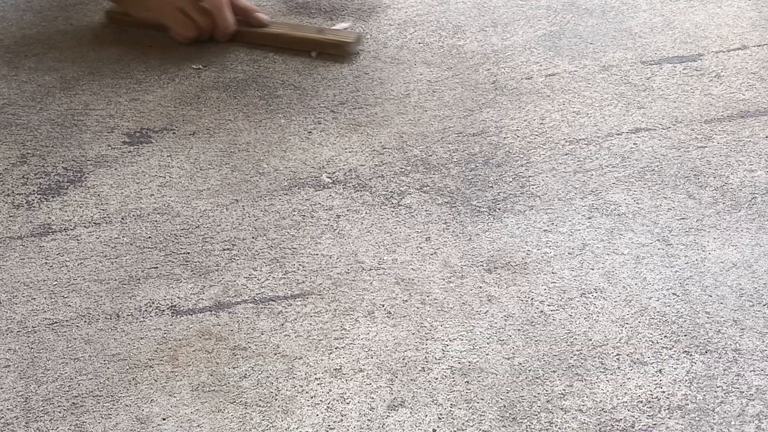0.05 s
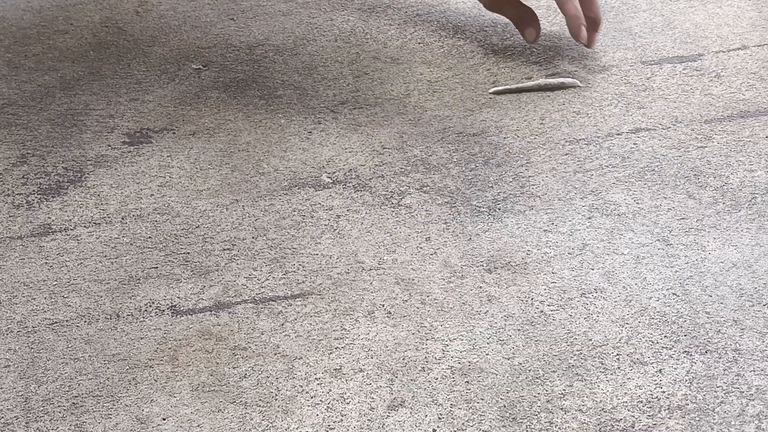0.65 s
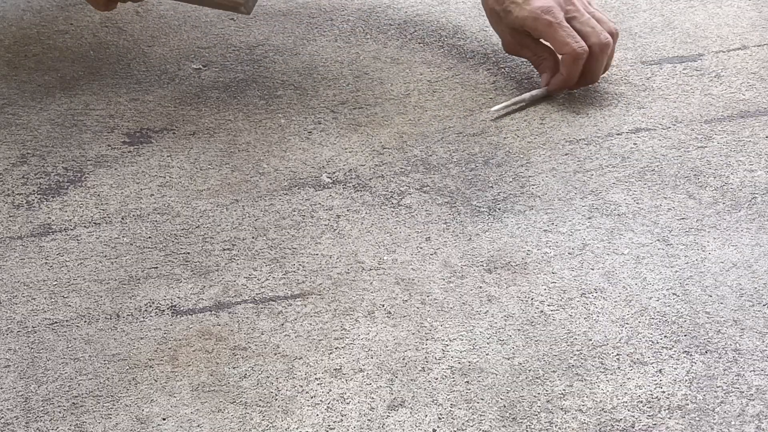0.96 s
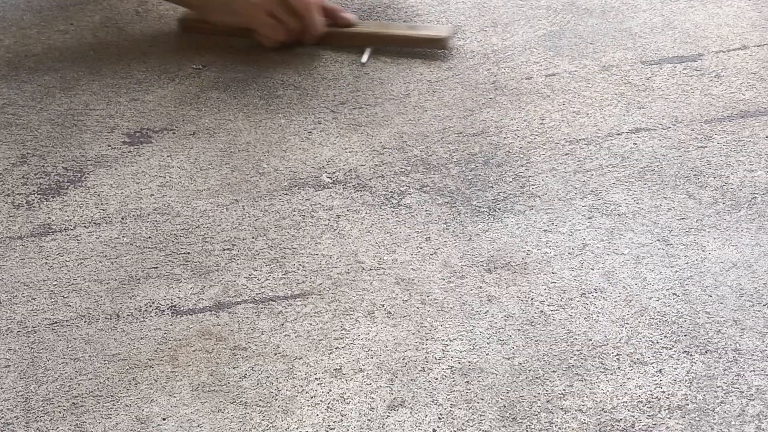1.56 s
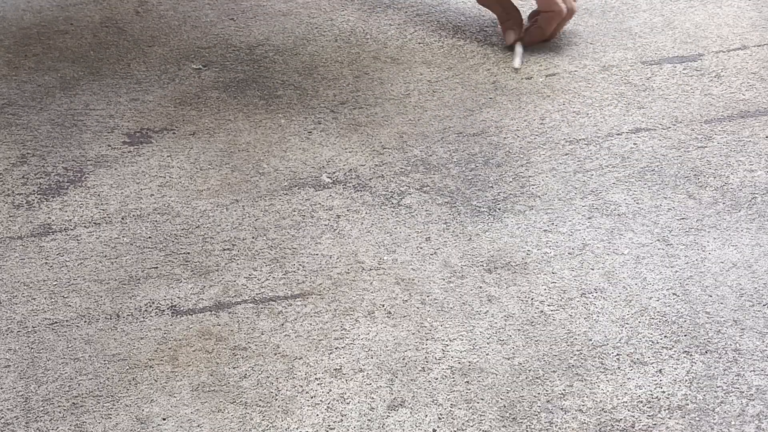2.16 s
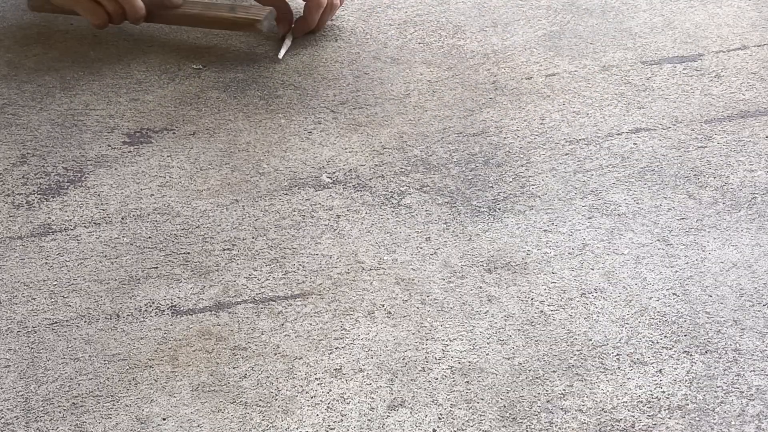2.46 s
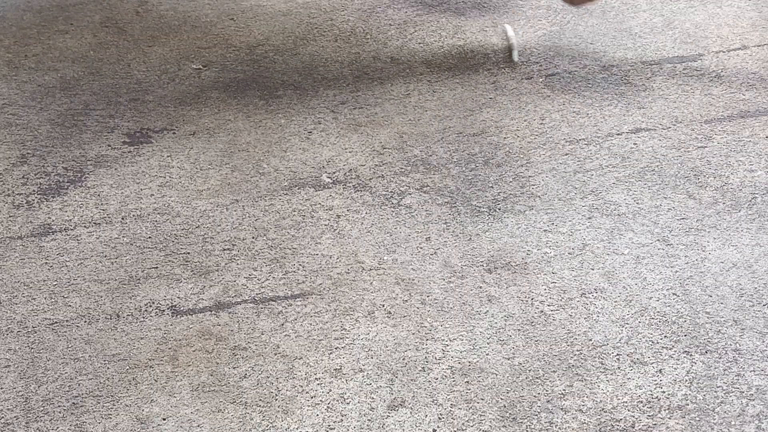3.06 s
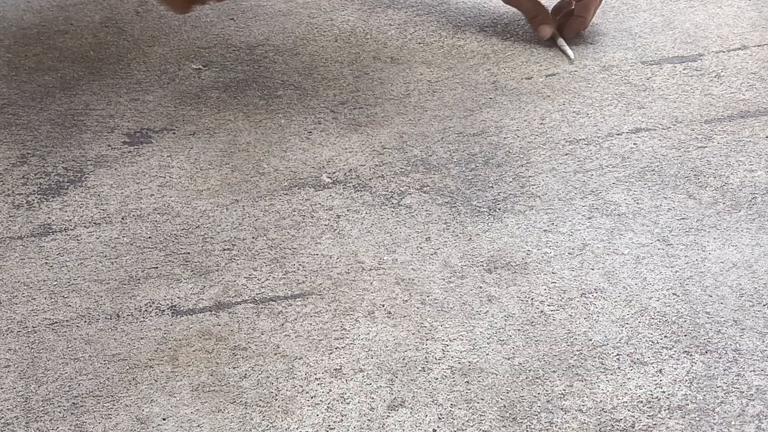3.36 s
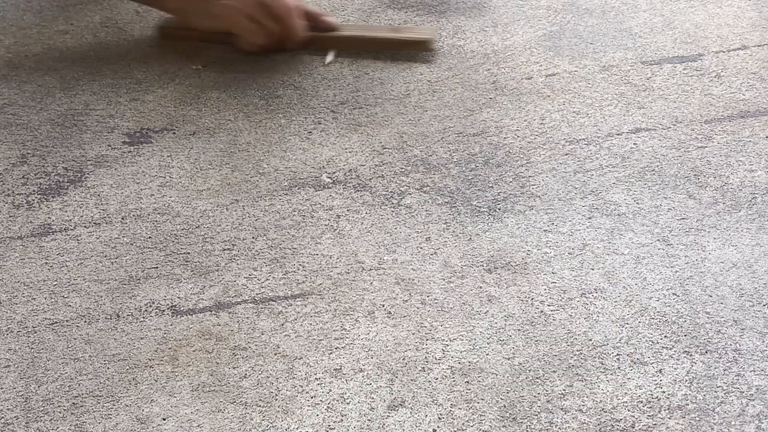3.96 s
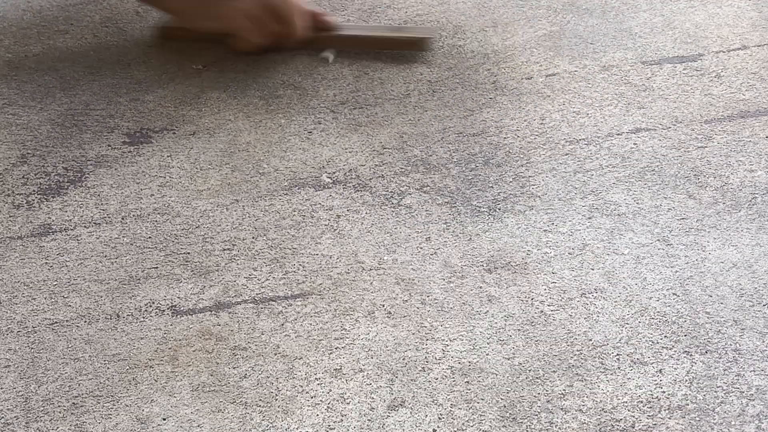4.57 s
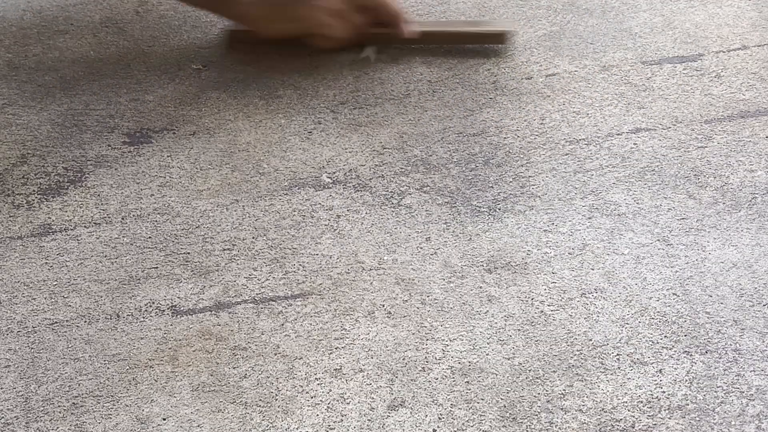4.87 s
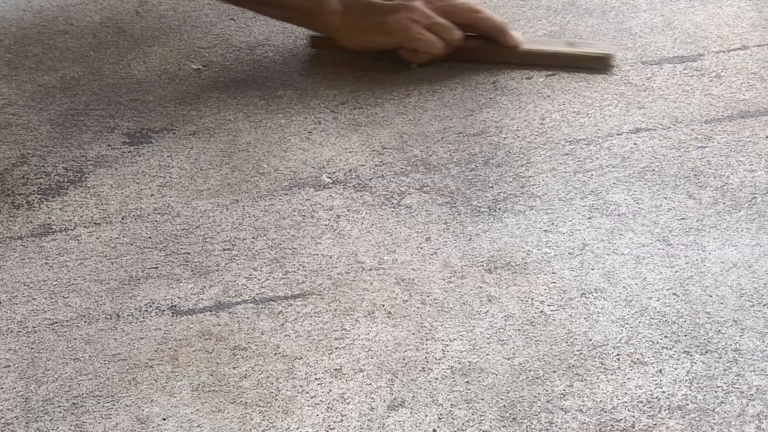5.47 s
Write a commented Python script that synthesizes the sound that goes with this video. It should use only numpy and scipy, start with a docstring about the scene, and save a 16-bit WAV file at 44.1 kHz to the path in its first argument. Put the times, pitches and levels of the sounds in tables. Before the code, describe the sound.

Close by, wood scrapes on concrete with a dry, sandy rasp and a slightly hollow ring. The first three rubs are separate, each a quick push and pull with light knocks and cracking grit. Soft fibre crackles, tiny clicks and a couple of dull clacks fill the pauses. A run of rapid back-and-forth scrubbing follows and is the loudest part. Hard walls add a very short echo over a quiet low rumble.

```python
"""A wooden board, rubbed by hand over a concrete floor, rolls a small twist of fibre: single strokes,
then fast back and forth. Grit catches under the board and rings its modes (the pitches it likes to
shake at). A push rings lower than a pull, and the board knocks as it lands. Between strokes, fingers
straighten the roll. A small, hard space answers, over a low rumble and a faint far-off tone."""
import sys
import numpy as np
from scipy import signal
from scipy.fft import rfft, irfft, next_fast_len
from scipy.io import wavfile
from scipy.ndimage import map_coordinates

SR = 44100
rng = np.random.default_rng(int(sys.argv[2]) if len(sys.argv) > 2 else 0)


def transcribe(u):
    """Save the signal u as a 16-bit wav file named by the first command-line argument.

    u: samples, shape (n,) or (channels, n), limited to [-1, 1]; the rate is SR.
    q: integer samples, one column per channel.
    """
    v = np.clip(np.atleast_2d(u).T, -1, 1)
    q = np.round(v * 32767).astype(np.int16)
    wavfile.write(sys.argv[1], SR, q)


N = 252693

# The board's modes in five groups, from low to high: pitch_hz, width_hz, level_db
BODY_MODES = [(381.6, 67, -8.5), (502, 43, -6.5), (741, 51, 8), (1120, 110, -3.5)]
LOW_RING_MODES = [(1600, 90, 0), (1730, 110, -2)]
RING_MODES = [(1947, 92, -8.5), (1930, 87, 1), (1900, 16, 2), (2018, 200, -7.5)]
CHATTER_MODES = [(3060, 160, -13.5), (3550, 120, 2), (3580, 390, 6.5), (3540, 130, -4)]
RASP_MODES = [(4750, 390, -2.5), (5360, 310, 1.5), (5543, 350, -1.5), (6140, 180, -1.5)]
# The hiss of crushed sand: pitch_hz, level_db
SAND_SPECTRUM = [(3000, -34), (6000, -9), (7400, 3), (8800, -4), (9700, 2.5), (11500, -3), (13000, -9.5),
                 (14100, -9), (15100, 1.5), (15900, -8), (16400, -32.5)]
# The finest hiss leans to the left: pitch_hz, left_minus_right_db
SAND_PAN = [(8000, -3.5), (11000, 8), (15000, 7)]

def board():
    """Rubbing and knocks ring the same modes; the board judders, so grains come in clumps."""
    times, (rasp_db, body_db, ring_db, sand_db) = knocks_and_bursts()
    rasp_level, body_level, ring_level, sand_level, low_ring_level = rubbing()
    # Pressing harder moves the sound down from the highest modes towards the ring.
    chatter_level = rasp_level ** 0.65 * ring_level ** 0.39
    judder = unit(amp(2.03 * wobble(70) + 0.83 * wobble(300)))
    cracks = amp(-9.5) * grit(rate=70, spread_db=2.5)  # larger grains hit all the upper modes at once

    def force(level, grains, blow_db, crush):
        return level * judder * grains + blows(times, blow_db, crush)

    def slide(impulse, rate, spread_db, depth_db=7, width_hz=170):
        return shifting_contact(grit(rate, spread_db), impulse, depth_db, width_hz, life_s=.045)

    body = resonator(BODY_MODES, skirt_db=10)
    low_ring = resonator(LOW_RING_MODES, skirt_db=13)
    ring = resonator(RING_MODES, skirt_db=12.5)
    chatter = resonator(CHATTER_MODES, skirt_db=15.5)
    rasp = resonator(RASP_MODES, skirt_db=11)
    sand = tap_response(lambda f: amp(along(SAND_SPECTRUM, f)))

    fine_grains = slide(sand, rate=5000, spread_db=5, depth_db=6, width_hz=300) + cracks
    grains = slide(rasp, rate=3500, spread_db=5) + cracks
    on_rasp = force(amp(-3.5) * rasp_level, grains, rasp_db + 16, crush=1.5)
    grains = slide(chatter, rate=3500, spread_db=6) + cracks
    on_chatter = force(amp(0.04) * chatter_level, grains, rasp_db + 16, crush=0.3)
    grains = slide(body, rate=4000, spread_db=4)
    on_body = force(amp(0.5) * body_level, grains, body_db + 18, crush=0.092)
    grains = slide(ring, rate=4400, spread_db=2.5)
    on_ring = force(amp(2) * ring_level, grains, ring_db + 22.5, crush=0.22)
    on_sand = force(amp(1) * sand_level, fine_grains, sand_db + 13, crush=1.6)
    grains = slide(low_ring, rate=4000, spread_db=3)
    on_low_ring = force(amp(-1.5) * low_ring_level, grains, ring_db + 14.5, crush=0.3)

    low = amp(-6) * through(on_body, body) + amp(-5) * bending(on_body, width_hz=67)
    middle = through(on_low_ring, low_ring) + through(on_ring, ring)
    high = through(on_chatter, chatter) + through(on_rasp, rasp)
    sides = np.array([[.5], [-.5]])
    hiss = filtered(through(on_sand, sand), lambda f: amp(along(SAND_PAN, f) * sides))
    return low + middle + high + hiss


# Each stroke: start_s, way (push or pull), swell_s, hold_s, fade_db_per_s, rasp_db, hold_change_db,
# lean_db_per_s (weight moving on or off the board), then compared with the rasp: body_db, ring_db, hiss_db
STROKES = [ (0.071, "push", .002, 0.0055, 400, -50.5, 3.5, -200, 0.5, -5, -6.5),
           (0.112, "push", 0.016, .16, 194, -39.5, 3, 0, -20.5, -5, -11),
           (0.265, "push", 0.045, .025, 98, -33, -0.5, -63, -19, -5.5, -9.5),
           (0.428, "pull", 0.0013, 0.073, 439, -40.5, -3, -17, -7, 4, -6.5),
           (1.57, "push", 0.0013, .01, 201.5, -29, 1, -5, -18.5, -7.5, -13),
           (1.632, "push", 0.034, 0.073, 352, -33.5, -2, -3, -27, -5, -15),
           (1.799, "pull", .018, .015, 409, -59, 0, -3, -17, -14, 3.5),
           (1.835, "pull", 0.0016, .093, 503, -40.5, -9, 3, -15, 4, -12.5),
           (2.764, "push", 0.0018, 0.099, 255, -53.5, 0.5, 22, -8.5, -6.5, -9.5),
           (2.919, "pull", 0.011, .045, 300, -69, -3, -3, -19, -19, 1.5),
           (2.976, "pull", 0.023, 0.092, 422, -38.5, -5, 34, -9, 3, -9.5),
           (3.96, "push", 0.041, 0.11, 232, -40, 5, -66, -24.5, -6.5, -11.5),
           (4.145, "pull", .02, 0.039, 500, -56, -2.5, 0, -32, -9, -3),
           (4.242, "pull", 0.026, 0.085, 300, -55, -3, -2, -16, -13, -4),
           (4.338, "push", 0.0023, 0.034, 230, -32, 4, 5, -19, -3.5, -12),
           (4.438, "pull", .03, 0.067, 332, -26.5, -2, 70, -26.5, -6.5, -16),
           (4.608, "pull", 0.026, 0.066, 287, -55.5, 2, -60, -26, -12, -11),
           (4.689, "push", .014, 0.019, 204, -32, 2, 0, -19, -8, -15),
           (4.777, "pull", 0.075, 0.021, 299, -22, -2, 0, -21.5, -5, -12),
           (4.984, "push", 0.0023, 0.097, 398.5, -25, -1.5, -38, -18, -4, -13),
           (5.1, "pull", 0.034, 0.062, 482, -24.5, 1.5, 116, -15.5, -3, -16.5),
           (5.262, "pull", 0.0022, 0.088, 400, -47.5, -3, -130, -7, 4, -10.5),
           (5.336, "push", 0.0034, 0.055, 272, -26, -2, 2, -11.5, -3.5, -14),
           (5.415, "push", 0.067, 0.023, 357, -24, 2.5, 5, -8.5, -1.5, -13.5),
           (5.584, "pull", .012, 0.072, 300, -53, -4, -80, -26, -9.5, -13),
           (5.668, "push", 0.0015, 0.044, 300, -31.5, -0.5, -2, -4.5, 0, -8), ]
# Multipliers on a stroke's swell, change and fade in dB: rasp, body, ring, hiss, low_ring
EFFORT_SCALES = [1.2, 1.07, 1.26, 1.21, 1.34]
# Share of the lean that each part feels: rasp, body, ring, hiss, low_ring
LEAN_SHARES = [0.041, 0.7, 0.89, 0.82, .3]

def rubbing():
    """How hard strokes drive each part; leaning swells or fades body, ring and hiss against the rasp."""
    low_ring_db = {"push": -4.5, "pull": -13.5}  # compared with the ring: a pull hardly wakes it
    power = np.zeros((len(EFFORT_SCALES), N))
    for start, way, swell, hold, fade, db, change_db, lean, body_db, ring_db, hiss_db in STROKES:
        gate, effort_db = effort(start, swell, hold, fade, change_db)
        heard = np.flatnonzero((gate > 0) & (effort_db > -70))
        weight_db = lean * (heard / SR - (start + swell + hold / 2))
        colour_db = np.array([0, body_db, ring_db, hiss_db, ring_db + low_ring_db[way]])
        motion_db = np.outer(EFFORT_SCALES, effort_db[heard]) + np.outer(LEAN_SHARES, weight_db)
        power[:, heard] += (gate[heard] * amp(db + colour_db[:, None] + motion_db)) ** 2
    return np.sqrt(power)


def effort(start, swell, hold, fade, change_db):
    """One rub grips, swells, holds and fades: gives its switch-on (0 to 1) and its effort in dB."""
    grip_s, swell_db = .0007, 16.5
    t = np.arange(N) / SR - start
    rising = np.clip(t / max(swell, grip_s), 0, 1)
    holding = np.clip((t - swell) / max(hold, grip_s), 0, 1)
    fading_s = np.maximum(t - swell - hold, 0)
    effort_db = swell_db * (rising - 1) + change_db * (holding - .5) - abs(fade) * fading_s
    return np.clip(t / grip_s, 0, 1), effort_db


# The board knocks on the floor: start_s, strength_db, weight_db (heavy and flat +, glancing -)
KNOCKS = [(0.077, -45, -0.5), (0.297, -33.5, 5.5), (0.432, -37, 6.5), (1.572, -24.5, -3.5),
          (1.838, -27, 4.5), (2.770, -41.5, -4.5), (2.984, -46, 7), (3.997, -28, -5), (4.339, -25.5, -7.5),
          (4.365, -27.5, 0), (4.694, -38, 1.5), (4.986, -23, 1.5), (5.081, -29, -6.5), (5.127, -26.5, -6.5),
          (5.261, -25, 9), (5.339, -30, 4.5), (5.667, -34.5, 2)]
# A coarse grain bursts under the board: start_s, strength_db
GRAIN_BURSTS = [(0.335, -31.5), (0.387, -35.5), (0.451, -26), (0.509, -34.5), (1.616, -30), (1.674, -32.5),
                (1.753, -38.5), (3.020, -33), (3.063, -28), (3.086, -34), (4.021, -33), (4.047, -33),
                (4.417, -28.5), (4.460, -31.5), (4.479, -29), (4.505, -27), (4.527, -29), (5.601, -36.5)]
# How they drive rasp, body, ring and hiss, a row each: knock_db, db_per_weight_db, burst_db
BLOW_SHARES = [(-2, -1, -2.5), (-16.5, 1.6, -29), (-1.5, 1.5, -12), (-14, 0.05, -2.5)]

def knocks_and_bursts():
    """Time and strength of each blow on rasp, body, ring and hiss; heavy knocks favour low modes."""
    knock_s, knock_db, weight_db = np.transpose(KNOCKS)
    burst_s, burst_db = np.transpose(GRAIN_BURSTS)
    parts_db = [np.r_[knock_db + db + per_weight * weight_db, burst_db + grain_db]
                for db, per_weight, grain_db in BLOW_SHARES]
    return np.r_[knock_s, burst_s], parts_db


# The pitch of the board's main bending mode: time_s, pitch_hz
BENDING_PITCH = [(0.081, 725), (0.4, 850), (1.57, 774), (1.899, 820), (2.799, 717), (3.09, 840), (4.0, 753),
                 (4.5, 900), (4.85, 823), (5.0, 647), (5.16, 880), (5.22, 718), (5.35, 686), (5.42, 780),
                 (5.52, 722), (5.7, 710)]

def bending(force, width_hz):
    """The board bends at a pitch that follows the point where it rests on the floor."""
    pitch_hz = np.interp(np.arange(N) / SR, *np.transpose(BENDING_PITCH))
    spin = np.exp(2j * np.pi * np.cumsum(pitch_hz) / SR)
    decay = np.exp(-np.pi * width_hz / SR)
    ring = (spin * signal.lfilter([1], [1, -decay], force / spin)).real
    ring *= np.sqrt(2 * (1 - decay ** 2))  # keeps the power of the force
    return signal.sosfilt(signal.butter(2, [450, 1250], "band", fs=SR, output="sos"), ring)


def grit(rate, spread_db, lag_ms=.135, lag_spread_ms=.06):
    """About rate grains a second snap at random, most heard a little later on the left."""
    count = 300000
    chance, size, place = rng.random(count), rng.standard_normal(count), rng.standard_normal(count)
    at, sign = rng.integers(0, N, count), rng.choice([-1, 1], count)
    snaps = chance < rate * N / SR / count
    force = sign * amp(spread_db * np.minimum(size, 3)) * snaps
    lag = np.round((lag_ms + lag_spread_ms * place) * SR / 1000).astype(int)
    left, right = np.bincount((at + lag) % N, force, N), np.bincount(at, force, N)
    return unit(np.array([left, right]))


def shifting_contact(x, impulse, depth_db, width_hz, life_s):
    """As the contact slides, narrow bands swell and fade in turn; their joint power stays steady."""
    hz, t, spectrum = signal.stft(x, SR, nperseg=512)
    where = np.meshgrid(hz / width_hz, t / life_s, indexing="ij")
    patches = map_coordinates(rng.standard_normal((400, 600)), where, order=2)
    gain = amp(depth_db * np.tanh(patches))
    passed_power = np.abs(signal.freqz(impulse, worN=hz, fs=SR)[1]) ** 2
    gain /= np.sqrt(passed_power @ gain ** 2)
    return unit(signal.istft(spectrum * gain, nperseg=512)[1][:, :N])


def blows(times, dbs, crush, crush_s=0.005, lag_ms=0.095):
    """Each blow is a sharp push, then a moment of crumbling grit, crush times as strong."""
    force, t = np.zeros((2, N + SR)), np.arange(SR // 20) / SR
    for start, db in zip(times, dbs):
        blow = rng.standard_normal((2, len(t))) * np.exp(-t / crush_s)
        blow *= crush / np.linalg.norm(blow[0])
        blow[0, round(lag_ms * SR / 1000)] += 1  # the push reaches the left side later
        blow[1, 0] += 1
        force[:, round(start * SR):][:, :len(t)] += amp(db) * blow
    return force[:, :N]


# Fingers straighten the roll: start_s, swell_s, hold_s, fade_db_per_s, level_db, hold_change_db
FINGER_RUBS = [(0.954, 0.012, 0.0091, 398, -53.5, 0), (1.018, 0.0066, 0.074, 98, -68.5, -3.5),
               (1.291, 0.018, 0.025, 302, -70.5, -0.5), (1.386, 0.0054, 0.013, 400, -76, 3),
               (2.214, .055, 0.039, 498, -56, 1), (2.457, 0.0036, 0.0055, 268, -50, 0.5),
               (3.694, 0.024, 0.0051, 400, -53.5, 3), (3.774, .004, .066, 645, -59, -1)]
# Single grains click under the fingers: start_s, level_db
GRAIN_CLICKS = [(0.973, -45), (1.027, -50), (1.1, -62), (1.265, -52), (1.3932, -61), (2.1646, -51.5),
                (2.2249, -56.5), (2.4625, -29.5), (2.9347, -44), (3.71, -37.5), (3.727, -30.5),
                (3.7808, -38), (3.8258, -40)]
# The rustle of dry fibre: pitch_hz, level_db
FIBRE_SPECTRUM = [(350, -36.5), (600, -18), (1660, -12), (1880, -23), (2070, -4.5), (2440, -5), (6200, -1),
                  (13600, -11.5), (16000, -5)]

def fingers():
    """Dry fibres and loose sand crackle under the fingertips; now and then one grain clicks."""
    fibre = tap_response(lambda f: amp(along(FIBRE_SPECTRUM, f)))
    level = np.zeros(N)
    for start, swell, hold, fade, db, change_db in FINGER_RUBS:
        gate, effort_db = effort(start, swell, hold, fade, change_db)
        level += gate * amp(db + effort_db)
    grains = grit(rate=1400, spread_db=4.5)
    crackle = shifting_contact(grains, fibre, depth_db=7, width_hz=450, life_s=.05)
    times, dbs = np.transpose(GRAIN_CLICKS)
    clicks = blows(times, dbs + 7.5, crush=1.3, crush_s=0.0048)
    return through(level * crackle + clicks, fibre)


# Low, dull tones: start_s, level_db, pitch_hz, ring_s (time to fade by 60 dB)
DULL_TONES = [(0.562, -49.5, 134.7, 0.38), (1.273, -49, 222, 0.064), (1.691, -50, 390, 0.18),
              (2.475, -28.5, 228, 0.045), (2.513, -44, 210, 0.095), (2.549, -51.5, 108.4, 0.34),
              (2.616, -51.5, 123.4, 0.21), (2.963, -45.5, 130, 0.33), (2.99, -43.5, 491, 0.11),
              (3.03, -48, 430, 0.15), (3.724, -48.5, 209, 0.065), (3.91, -56, 56, 0.63)]

def dull_tones():
    """Low, unsteady tones die away: thuds, a hollow note within a stroke, a brief rumble."""
    sound = np.zeros(N)
    for start, db, hz, ring_s in DULL_TONES:
        t = np.maximum(np.arange(N) / SR - start, 0)
        level = amp(db - 60 * t / ring_s) * (1 - np.exp(-t / 0.0023))
        sound += level * np.sin(2 * np.pi * hz * t + wobble(50))
    return sound


# The board is laid down: start_s, level_db
CLACKS = [(2.461, -37), (2.478, -42), (2.515, -46), (3.726, -43.5), (3.779, -55), (3.826, -55)]
# The modes that ring as it lands flat: pitch_hz, width_hz, level_db
CLACK_MODES = [(427, 79, -8), (800, 58, 0.5), (1027, 21, 4), (1470, 600, -7)]

def clacks():
    """The flat of the board meets the floor with a dull, scuffing clack."""
    times, dbs = np.transpose(CLACKS)
    scuffs = blows(times, dbs + 13, crush=2.96, crush_s=0.025)
    return through(scuffs, resonator(CLACK_MODES, skirt_db=2))


# How long the walls echo: pitch_hz, ring_s (time to fade by 60 dB)
ECHO_TIMES = [(200, 0.25), (1000, 0.091), (2500, 0.18), (6000, 0.17), (15000, 0.1)]

def room(x, delay_s=.006):
    """Hard walls give a short echo, different on each side; the bass lasts longest."""
    hz, t, noise = signal.stft(rng.standard_normal((2, SR // 2)), SR, nperseg=256)
    fade = amp(-60 * t / along(ECHO_TIMES, hz)[:, None])
    tail = signal.istft(noise * fade, SR, nperseg=256)[1]
    tail /= np.linalg.norm(tail[0])
    return through(x, np.pad(tail, ((0, 0), (round(delay_s * SR), 0))))


# The background noise: pitch_hz, level_db
RUMBLE_SPECTRUM = [(25, -22.5), (45, -16), (60, -8), (85, -5.5), (117, -0.5), (150, -8), (220, -10.5),
                   (400, -20), (1400, -26.5), (3400, -33.5), (6500, -36), (8000, -46), (13500, -45.5),
                   (15500, -36.5)]
# How alike its left and right sides are: pitch_hz, likeness (0 to 1)
RUMBLE_LIKENESS = [(60, 1), (300, 0.73), (1000, 0.04), (3000, 0.35), (15000, 0.25)]

def rumble():
    """A low rumble, nearly the same on both sides, with a thin hiss above it."""
    def mid_and_side_gains(f):
        angle = np.arccos(np.clip(along(RUMBLE_LIKENESS, f), -1, 1)) / 2
        return amp(along(RUMBLE_SPECTRUM, f)) * np.array([np.cos(angle), np.sin(angle)])
    mid, side = filtered(rng.standard_normal((2, N)), mid_and_side_gains)
    return amp(-66 + 1.3 * wobble(6.9)) * unit(np.array([mid + side, mid - side]))


# A far-off tone comes and goes: middle_s, half_length_s, pitch_hz, level_db
FAR_SWELLS = [(0.70, 0.031, 1470, -73), (1.24, 0.1, 1460, -74), (2.449, 0.029, 1490, -69.5),
              (3.334, 0.044, 1420, -72)]

def far_tone():
    """Soft swells of narrow-band noise sound like a faint, smeared, distant tone."""
    t, sound = np.arange(N) / SR, np.zeros((2, N))
    for middle_s, half_s, hz, db in FAR_SWELLS:
        band = filtered(rng.standard_normal((2, N)), lambda f: np.exp(-((f - hz) / 230) ** 2))
        swell = np.exp(-.5 * ((t - middle_s) / half_s) ** 2)
        sound += amp(db + 1.5) * swell * unit(band)
    return sound


def resonator(modes, skirt_db):
    """How a group of modes rings after one tap; outside it, each octave loses skirt_db more."""
    def gain(f):
        power = sum(amp(db) ** 2 * (f * width) ** 2 / ((hz * hz - f * f) ** 2 + (f * width) ** 2)
                    for hz, width, db in modes)
        octaves_outside = np.abs(np.log2((f + 1) / np.clip(f + 1, modes[0][0], modes[-1][0])))
        return np.sqrt(power) * amp(-skirt_db * octaves_outside)
    return tap_response(gain)


def tap_response(gain, size=4096):
    """The sound of one sharp tap (an impulse response of energy 1) with this gain at each pitch."""
    cepstrum = irfft(np.log(gain(np.fft.rfftfreq(size, 1 / SR)) + 1e-6))
    # Folding the late half onto the early half packs the energy at the start.
    cepstrum[1:size // 2] *= 2
    cepstrum[size // 2 + 1:] = 0
    impulse = irfft(np.exp(rfft(cepstrum)))
    return impulse / np.linalg.norm(impulse)


def through(x, impulse):
    """Let stereo x ring through an impulse response."""
    return signal.fftconvolve(x, np.atleast_2d(impulse), axes=1)[:, :N]


def filtered(x, response):
    """Turn each pitch in x up or down by response(hz)."""
    size = next_fast_len(N + SR // 2)
    return irfft(rfft(x, size) * response(np.fft.rfftfreq(size, 1 / SR)), size)[..., :N]


def wobble(rate):
    """A smooth random curve through rate points a second."""
    return map_coordinates(rng.standard_normal(int(N * rate / SR) + 4), [np.arange(N) * rate / SR])


def along(points, hz):
    """Read between (pitch_hz, value) points, with octaves evenly spaced."""
    pitches, values = np.transpose(points)
    return np.interp(np.log(hz + 1), np.log(pitches), values)


def amp(db):
    """Decibels to gain."""
    return 10 ** (np.asarray(db) / 20)


def unit(x):
    """Scale to an average power of 1."""
    return x / np.sqrt(np.mean(x ** 2) + 1e-20)


def scene():
    """Board, fingers and dull tones, their echo and the background."""
    near = board() + fingers() + dull_tones() + clacks()
    return near + amp(-11) * room(near) + rumble() + far_tone()


def record(dry, top_hz=16200):
    """Cut away the very highest treble."""
    return filtered(dry, lambda hz: hz < top_hz)


dry = scene()
out = record(dry)
transcribe(out)
```